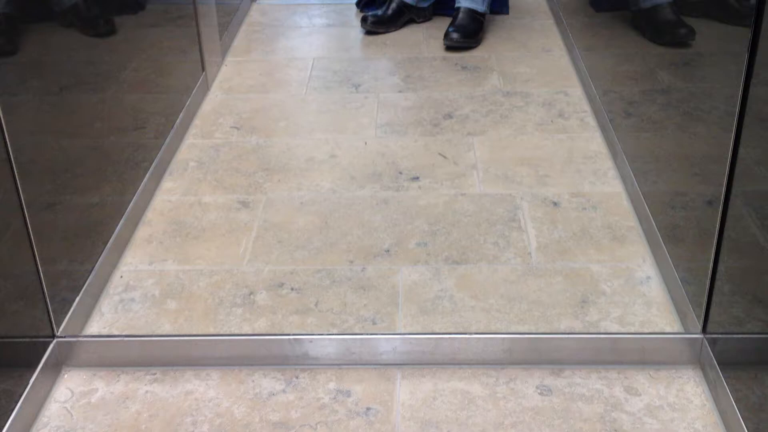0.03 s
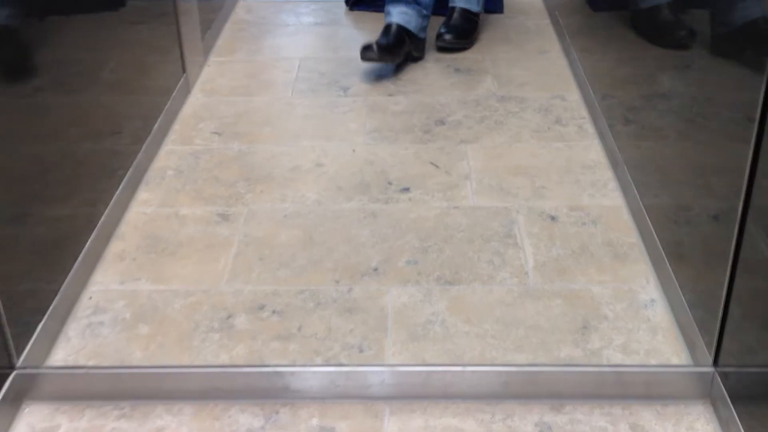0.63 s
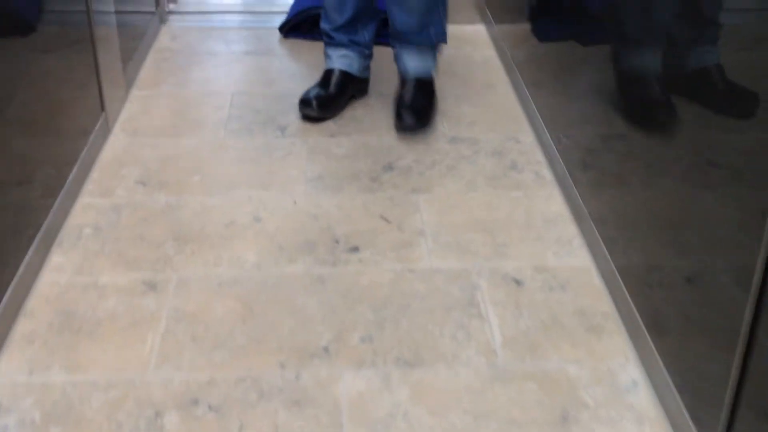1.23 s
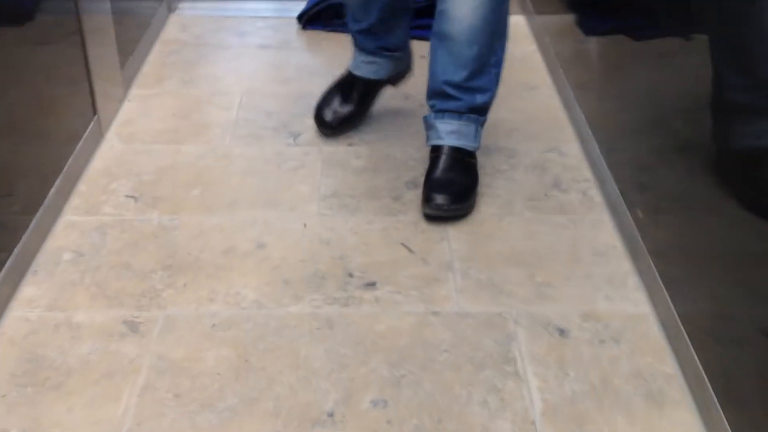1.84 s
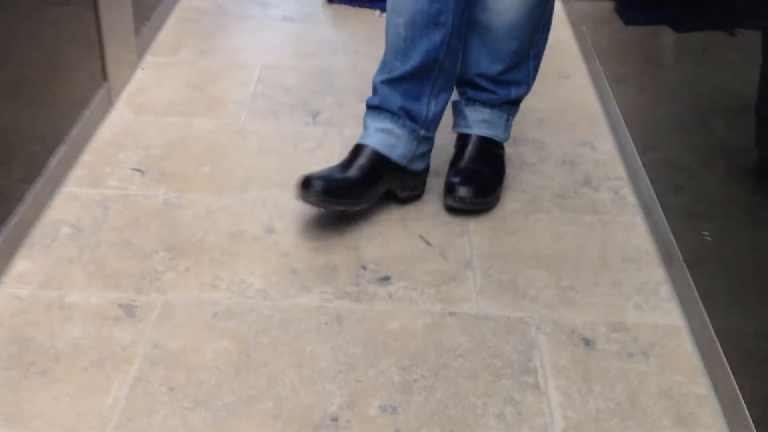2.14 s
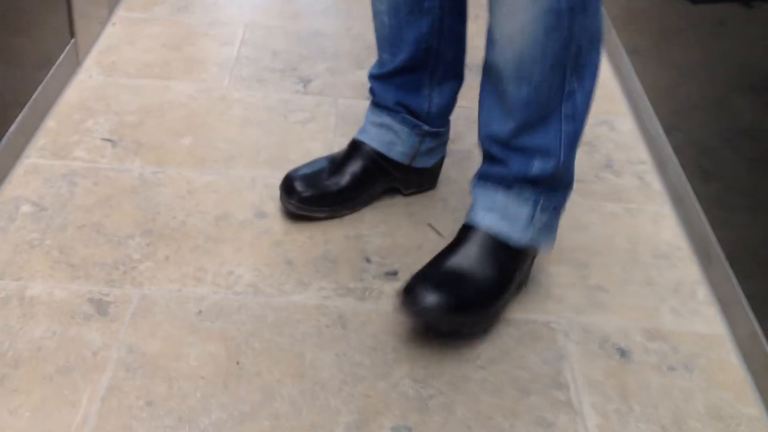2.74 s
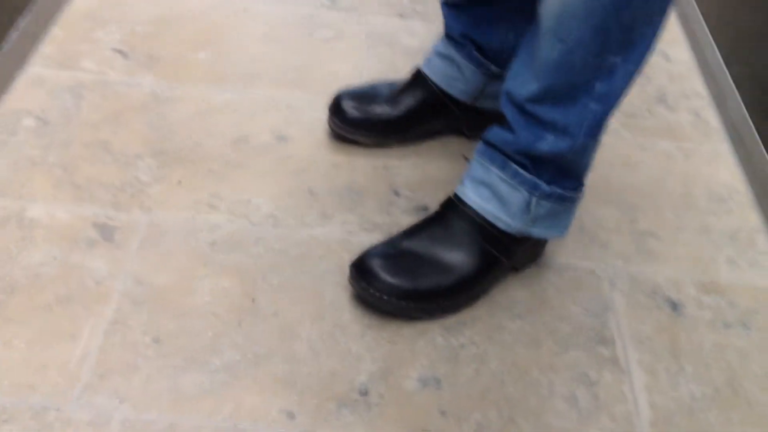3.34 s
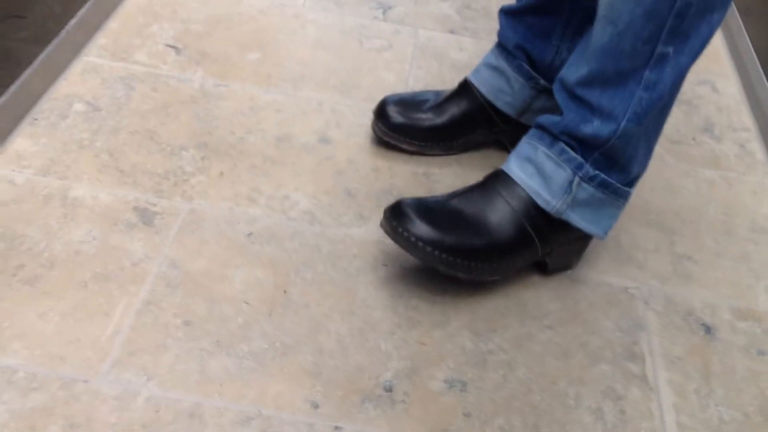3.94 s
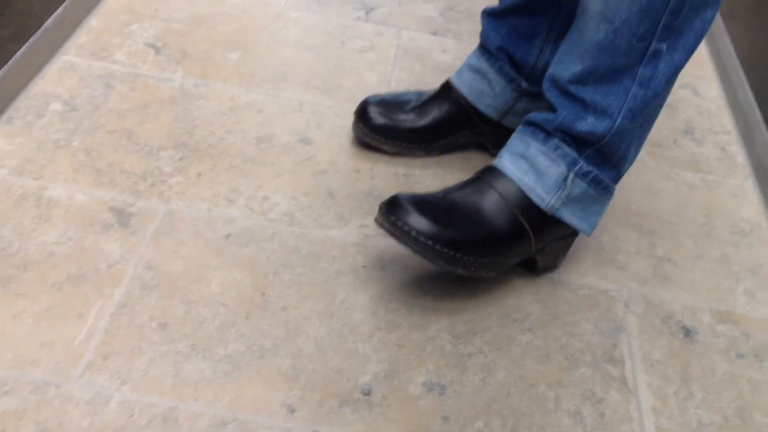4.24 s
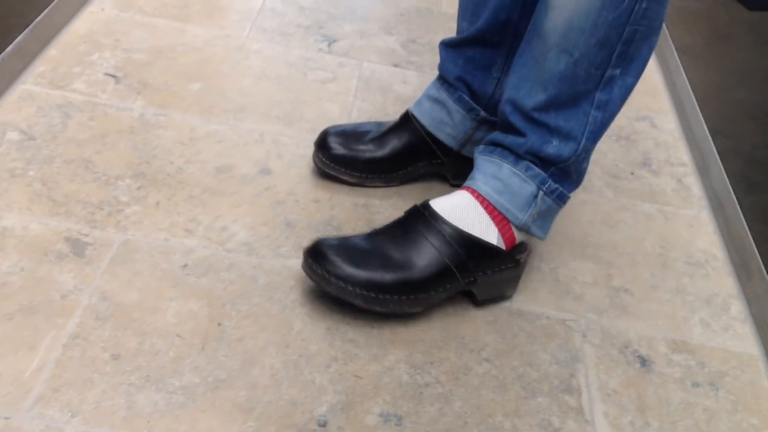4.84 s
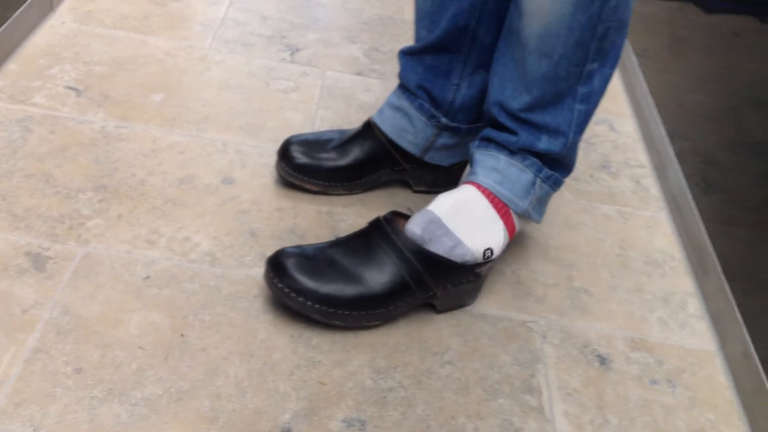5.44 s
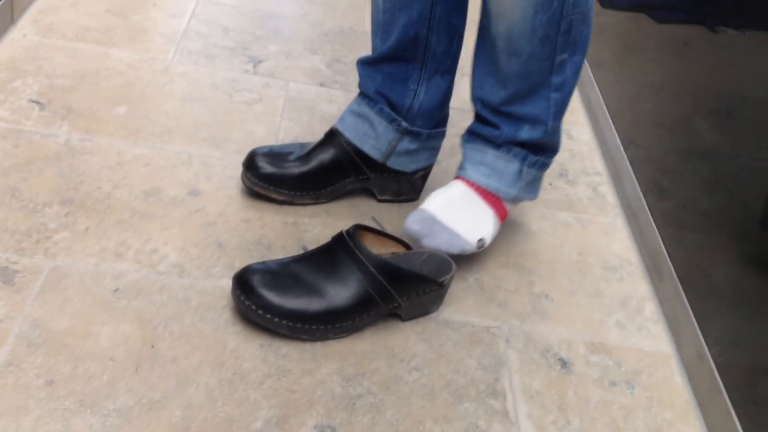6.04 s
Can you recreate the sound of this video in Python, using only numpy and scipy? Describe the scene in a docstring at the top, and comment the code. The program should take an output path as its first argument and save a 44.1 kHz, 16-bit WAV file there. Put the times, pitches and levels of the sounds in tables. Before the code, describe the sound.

Inside a small elevator, ventilation hums quietly as wooden clogs knock on a hollow stone floor, heard from close by. Two footfalls land heavily, with lighter knocks, gritty scuffs and a faint denim rustle around them, all echoing between the close walls. The walking stops, and a sock slides against leather in several short, soft strokes as one foot leaves its clog.

```python
"""Wooden clogs in a small lift

Someone takes a few steps over the stone floor of a lift cabin, then slips one foot out of its clog.
Each footfall clacks, thumps the hollow floor and sets the cabin ringing. Soles scuff over grit,
jeans brush and a sock rubs on leather, over humming ventilation and three faint, thin whistles."""
import sys
import numpy as np
from scipy import signal
from scipy.fft import rfft, irfft
from scipy.io import wavfile

SR = 44100
rng = np.random.default_rng(int(sys.argv[2]) if len(sys.argv) > 2 else 0)


def to_wav(sig):
    """Store sig (one row per channel, or 1-D mono) as 16-bit WAV at the path in sys.argv[1].

    Samples outside -1..1 are clipped; the rate is SR.
    """
    pcm = np.clip(np.atleast_2d(sig), -1, 1) * 32767
    pcm = np.round(pcm).astype(np.int16)
    wavfile.write(sys.argv[1], SR, pcm.T)  # frames by channels


N = 272538
TIME = np.arange(N) / SR
FREQ = np.maximum(np.arange(N // 2 + 1) * SR / N, 1)


def from_db(db):
    """Decibels to gain."""
    return 10 ** (np.asarray(db) / 20)


def unit_rms(x):
    """Scale to an rms of 1."""
    return x / np.sqrt(np.mean(x ** 2) + 1e-20)


def fade(t, t60):
    """Exponential decay from t = 0, falling 60 dB in t60 seconds."""
    return np.exp(-np.log(1000) * np.maximum(t, 0) / t60)


def at_hz(points, hz, column=1):
    """Read one column of a table on a log-frequency axis."""
    table = np.array(points)
    return np.interp(np.log(hz), np.log(table[:, 0]), table[:, column])


def colour(x, spectrum):
    """Shape a steady noise with an EQ curve; rms 1."""
    return unit_rms(irfft(rfft(x) * from_db(at_hz(spectrum, FREQ)), N))


def butter(x, hz, kind, order=2):
    """Causal Butterworth filter."""
    sections = signal.butter(order, np.clip(hz, 10, .45 * SR), kind, fs=SR, output="sos")
    return signal.sosfilt(sections, x + 1e-18)


def resonance(x, hz, width):
    """Two-pole resonance with gain 1 at its peak; width in Hz."""
    r = np.exp(-np.pi * width / SR)
    feedback = [1, -2 * r * np.cos(2 * np.pi * hz / SR), r * r]
    return signal.lfilter(np.array([1, 0, -1]) * (1 - r * r) / 2, feedback, x + 1e-18)


def steep_resonance(x, hz, width):
    """A resonance with its skirts trimmed by a second one twice as wide."""
    return resonance(resonance(x, hz, width), hz, 2 * width)


def drift(rate_hz):
    """Random wander, mostly slower than rate_hz; rms 1."""
    return unit_rms(irfft(rfft(rng.standard_normal(N)) / (1 + (FREQ / rate_hz) ** 2), N))


def add(track, start, sound):
    """Mix a sound into a track at a start time in seconds."""
    i = max(int(start * SR), 0)
    track[i:i + len(sound)] += sound[:N - i]


def friction(rough_db, rough_hz):
    """Countless tiny slips that come in clumps."""
    return rng.standard_normal(N) * from_db(rough_db * drift(rough_hz))


def swells(strokes):
    """Each stroke gathers speed and slows, half as strong at its ends; strokes add in power."""
    power = 0
    for middle, length, db in strokes:
        from_middle = 2 * np.arccosh(2) * abs(TIME - middle) / length
        power += (from_db(db) / np.cosh(np.minimum(from_middle, 20))) ** 2
    return np.sqrt(power)


def wall_echo(x, early_t60=0.18):
    """Dense reflections: a quick burst between the close walls, then a longer tail."""
    # Each row: frequency in Hz, early level in dB, tail level in dB, tail t60 in seconds.
    reverb = [(89, -2, -8, 2.3), (173, -11, -11, 1.1), (350, 0.5, -6.5, 2.4), (696, 0.5, -4, 1.1),
              (1500, -1.5, -8, 0.79), (4040, -11.5, -8, 1.4), (12000, -3.5, -18, 0.27)]
    t = TIME[:int(1.5 * SR)]
    build_up = 1 - fade(t, 0.015)
    edges = 60 * 2 ** np.arange(0, 8.1, .5)   # half-octave bands, Hz
    white = rng.standard_normal((2, len(t)))
    response = 0
    for k, (low, high) in enumerate(zip(edges, edges[1:])):
        band = butter(white[k % 2], [low, high], "band")
        early_db, tail_db, tail_t60 = (at_hz(reverb, np.sqrt(low * high), c) for c in (1, 2, 3))
        for db, t60 in ((early_db, early_t60), (tail_db, tail_t60)):
            part = band * build_up * fade(t, t60)
            response += from_db(db) * part * np.sqrt(2 * (high - low) / SR / np.sum(part ** 2))
    return signal.fftconvolve(x, response)[:N]


def ventilation(air_db=-61.5):
    """A steady bed of air with a few weak hum lines that waver in pitch and level."""
    # Hum lines. Each row: pitch in Hz, level in dB.
    hum_lines = [(151, -75), (250, -74.5), (313, -73.5)]
    # Tone of the moving air. Each row: frequency in Hz, relative level in dB.
    air_eq = [(30, -29), (60, -16), (90, -12), (150, -10), (260, -7), (450, -10), (700, -10.5), (1200, -14),
              (2800, -19), (7500, -19.5), (10000, -29.5), (13500, -23), (15400, -26)]
    hum = sum(from_db(db + 2.6 * drift(5.3)) * np.sin(2 * np.pi * hz * TIME + 1.87 * drift(1.06))
              for hz, db in hum_lines)
    return from_db(air_db) * colour(rng.standard_normal(N), air_eq) + hum


def whistles():
    """Thin, faint whistles: narrow noise that swells and fades."""
    # Each row: start and length in seconds, pitch and width in Hz, level at the crest in dB.
    cues = [(0.42, 0.18, 4530, 100, -70.5), (0.56, 0.26, 4370, 130, -68.5), (6.085, 0.11, 4490, 70, -66)]
    out = np.zeros(N)
    for start, length, hz, width, db in cues:
        tone = unit_rms(resonance(resonance(rng.standard_normal(N), hz, width), hz, width))
        out += from_db(db) * tone * np.sin(np.pi * np.clip((TIME - start) / length, 0, 1))
    return out


def jeans():
    """One trouser leg brushes past the other."""
    # Denim on denim. Each row: frequency in Hz, relative level in dB.
    denim_eq = [(240, -8), (400, -0.5), (543, -5), (642, -3), (1130, -5.5), (1530, -6.5), (2210, -9),
                (4520, -6.5), (5190, -11), (7040, -6), (9990, -19.5), (13600, -19.5), (15300, -24)]
    # Each row: middle of the brush in seconds, length in seconds, level in dB.
    brushes = [(0.47, 0.14, -60), (0.76, 0.11, -60), (0.99, 0.26, -55.5), (1.73, .2, -57.5),
               (1.89, 0.063, -59.5), (2.27, 0.83, -59.5), (2.53, 0.18, -57.5), (2.9, 0.33, -57.5),
               (3.17, 0.14, -58), (3.5, 0.35, -57.5), (3.8, 0.063, -64)]
    return swells(brushes) * colour(friction(rough_db=1.5, rough_hz=60), denim_eq)


def sock():
    """The foot works out of its clog in short slides, rubbing the leather and sounding the air inside."""
    # Sock on leather. Each row: frequency in Hz, relative level in dB.
    sock_eq = [(260, -31), (450, -18), (492, -2), (632, 1.5), (928, -1), (1040, 0.5), (3200, 0.5),
               (3660, -1), (4240, 0), (7770, -1), (9840, -11.5), (12800, -8), (15300, -12)]
    # Air between foot and clog. Each row: pitch in Hz, width in Hz, level against the rub in dB.
    cavity_modes = [(121, 107, -16.5), (238, 17, -12.5), (326, 50, -7.5), (402, 77, -23)]
    # Each row: middle of the slide in seconds, length in seconds, rub level in dB.
    slides = [(4.16, .2, -66), (4.36, 0.13, -57), (4.49, 0.15, -57), (4.73, 0.21, -53.5), (4.83, .14, -51),
              (5.08, 0.28, -59.5), (5.39, 0.24, -66), (5.73, 0.2, -69), (5.99, 0.096, -63.5)]
    rub = friction(rough_db=0.8, rough_hz=70)
    cavity = sum(from_db(db) * unit_rms(steep_resonance(rub, hz, width))
                 for hz, width, db in cavity_modes)
    return swells(slides) * (colour(rub, sock_eq) + cavity)


def scuffs():
    """Grit grinds under a sliding sole; a light touch is brighter, a heavy one sounds the clog's hollow."""
    # Grit on stone. Each row: frequency in Hz, relative level in dB.
    grit_eq = [(350, -47), (600, -14.5), (735, -6.5), (854, -5.5), (1070, -14), (1150, -7), (1750, -9),
               (2850, -9.5), (3690, -12.5), (4710, -8), (5110, -13), (6980, -7), (9790, -21.5),
               (13900, -19.5), (15300, -26)]
    # The hollow of the clog. Each row: pitch in Hz, width in Hz, relative gain in dB.
    hollow_modes = [(340, 270, 3), (856, 380, -7.5)]
    # Each row: start in seconds, hiss level in dB, rise, hold and t60 in seconds, tilt in dB per octave.
    scrapes = [(0.148, -52.5, 0.0046, 0.029, 0.43, -3), (0.684, -56, 0.024, 0.025, 0.17, 1),
               (1.258, -58, 0.028, 0.086, 0.11, -2), (1.376, -35.5, 0.0067, 0.079, 0.32, 1.9),
               (1.842, -57.5, 0.017, 0.013, 0.1, 7), (1.963, -47.5, 0.0013, 0.012, 0.11, 0.8),
               (2.111, -51, 0.001, 0.0087, 0.12, 3.5), (2.235, -57.5, 0.004, 0.024, 0.3, 1.5),
               (2.808, -47.5, 0.004, 0.012, 0.47, 6.5), (3.214, -41, 0.088, 0.049, 0.11, 0.5),
               (4.668, -54, 0.0045, .012, 0.15, 0)]
    slips = friction(rough_db=1.5, rough_hz=252)
    grit = colour(slips, grit_eq)
    grit += from_db(-10) * resonance(grit, 4760, 110)   # a faint squeal of wood on stone
    hollow = unit_rms(sum(from_db(db) * steep_resonance(slips, hz, width)
                          for hz, width, db in hollow_modes))
    grit_spectrum, out = rfft(grit), np.zeros(N)
    for start, db, rise, hold, t60, tilt in scrapes:
        stroke = np.clip((TIME - start) / rise, 0, 1) * fade(TIME - start - rise - hold, t60)
        hiss = unit_rms(irfft(grit_spectrum * from_db(tilt * np.log2(FREQ)), N))
        hollow_db = -7.5 - 3 * tilt   # the brighter the scrape, the less body
        out += from_db(db) * stroke * (hiss + from_db(hollow_db) * hollow)
    return out


def standing_waves(at_back, at_front):
    """The cabin's modes store each blow and let it go slowly; where the foot lands sets their mix."""
    # Each row: pitch in Hz, gain in dB when struck at the back, the same at the front, t60 in seconds.
    modes = [(91.8, -22, -7, 1.0), (115, -54.5, -11.5, 1.6), (156, -22.5, -14, 1.3), (159.6, -17, -17, 1.7),
             (178.24, -9.5, -9.5, 1.16), (225.4, -17, -50, 0.53), (244, -7.5, -7.5, 2.45),
             (235.4, -40, -21, 0.41), (315.6, -5.5, 2.5, 0.89), (338, -42, -26, 0.9),
             (341.5, -17, -0.5, 1.2), (400, -17, -6, 0.35), (408, -23, -4.5, 0.63), (450, -10, -58, 0.33),
             (514, -4.5, -1.5, 0.58), (540, -3, -37, 0.23), (622, -43, 9, 2.7), (686, -6.5, -16, 0.14),
             (697, -35, -28, 0.27), (678, -33, -55, 0.26), (750, -52, -14, 0.35), (825, -45, -51, 0.24),
             (854, -35, -18, 0.99), (930, -29, -10, .7)]
    ring = np.zeros(N)
    for hz, back_db, front_db, t60 in modes:
        drive = from_db(back_db) * at_back + from_db(front_db) * at_front
        ring += resonance(drive, hz, width=np.log(1000) / np.pi / t60)
    return ring


def footfalls():
    """Wood clacks and the hollow floor flexes for a few cycles; steps at the front are drier, shorter."""
    # Heel and toe knocks. Each row: start in seconds, clack level in dB, clack low-pass in Hz,
    # thump level in dB, thump pitch in Hz.
    knocks = [(0.152, -30, 3030, -38, 202.5), (0.242, -46, 1500, -61, 193.6), (0.694, -45, 450, -30.5, 161),
              (0.714, -72, 350, -37, 217), (0.865, -58, 400, -41.5, 172.3), (1.379, -21.5, 760, -23, 182),
              (1.411, -27.5, 820, -30.5, 188), (1.967, -48, 1500, -51.5, 208),
              (2.112, -44.5, 1000, -47, 139), (2.135, -56, 506, -44, 230.3), (2.232, -50, 600, -44.5, 147),
              (2.401, -47, 497, -36, 159), (2.461, -50, 450, -49, 240), (2.81, -39.5, 770, -33.5, 151.5),
              (2.857, -57, 600, -49, 150), (2.951, -45.5, 513, -53, 350), (3.013, -45.5, 600, -49, 177),
              (3.154, -24, 440, -24, 186), (3.157, -37.5, 1300, -28, 138.4), (3.638, -55, 584, -57.5, 166),
              (4.677, -57, 370, -52, 286), (4.85, -66, 370, -48.5, 320), (5.726, -75, 400, -56, 138),
              (5.854, -73, 400, -52, 150)]
    # The wooden sole's ring. Each row: pitch in Hz, width in Hz, relative gain in dB.
    sole_modes = [(240, 196, 2), (400, 132, 5), (708, 265, 0.5), (1136, 285, 3.5), (1780, 1300, -1),
                  (3080, 890, 1.5), (5070, 1800, 0.5)]
    # The path through the cabin. Each row: time in seconds, place from 0 (back) to 1 (front).
    walk = [(1.4, 0), (2.4, 0.86), (3.1, 1)]
    echo_send_db, modes_send_db, thump_cycles = (4.5, -1.0), (21, 16.5), (4.68, 2.62)   # back, front
    direct, to_walls, at_back, at_front = np.zeros((4, N))
    t = TIME[:SR // 5]
    click = 1. * (t == 0)
    wood = sum((-1) ** k * from_db(db) * resonance(click, hz, width)
               for k, (hz, width, db) in enumerate(sole_modes))
    for start, clack_db, top_hz, thump_db, thump_hz in knocks:
        place = np.interp(start, *np.transpose(walk))
        echo_db, modes_db, cycles = (np.interp(place, [0, 1], ends)
                                     for ends in (echo_send_db, modes_send_db, thump_cycles))
        clack = butter(wood, top_hz, "low", order=4)
        length = cycles / thump_hz
        flex = np.sin(np.pi * np.minimum(t / length, 1)) ** 2
        thump = flex * np.cos(2 * np.pi * thump_hz * (t - length / 2))
        blow = from_db(clack_db) * clack / abs(clack).max() - from_db(thump_db) * thump
        blow = butter(blow, 84, "high", order=3)   # so small a floor radiates little deep bass
        add(direct, start, blow)
        add(to_walls, start, from_db(echo_db) * blow)
        add(at_back, start, from_db(modes_db) * (1 - place) * blow)
        add(at_front, start, from_db(modes_db) * place * blow)
    return direct + wall_echo(to_walls) + standing_waves(at_back, at_front)


def scene(echo_db=-4):
    """The mono mix; scuffs, rustles and whistles echo between the walls too."""
    textures = scuffs() + jeans() + sock() + whistles()
    return (footfalls() + textures + from_db(echo_db) * wall_echo(textures) + ventilation())[None]


def record(dry):
    """A small microphone with little deep bass and no extreme top; it opens after a moment of silence."""
    opens_s, low_cut_hz, high_cut_hz = .12, 45, 15400
    thin = butter(dry, low_cut_hz, "high") * (TIME >= opens_s)
    return signal.sosfilt(signal.ellip(12, .1, 70, high_cut_hz, fs=SR, output="sos"), thin)


dry = scene()
out = record(dry)
to_wav(out)
```